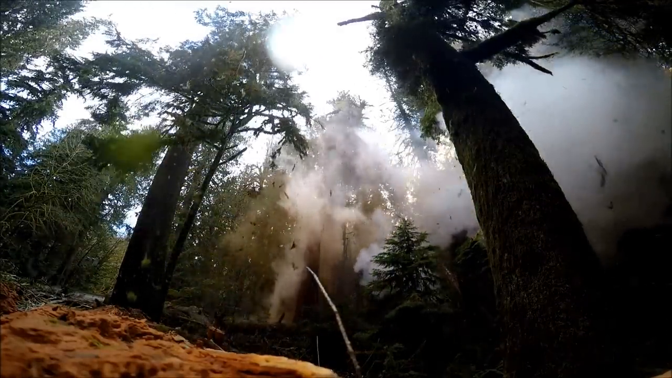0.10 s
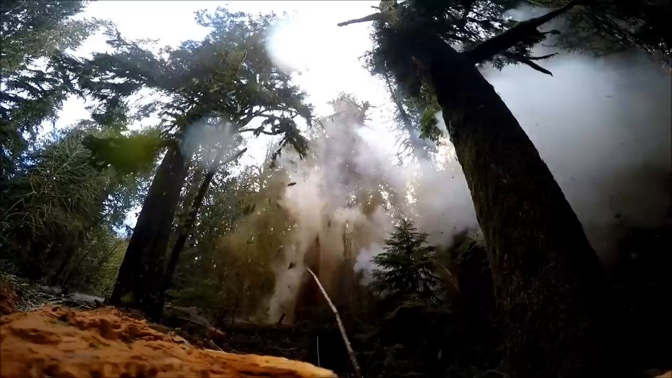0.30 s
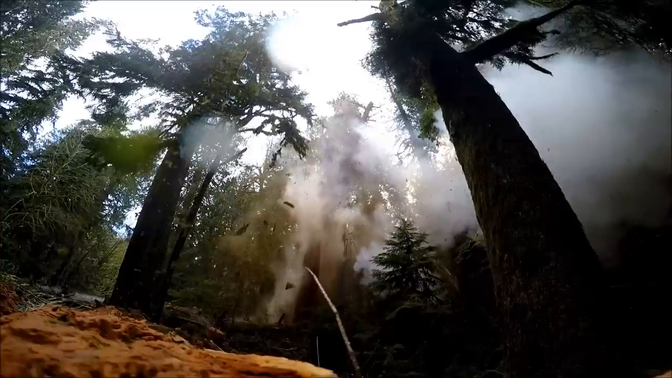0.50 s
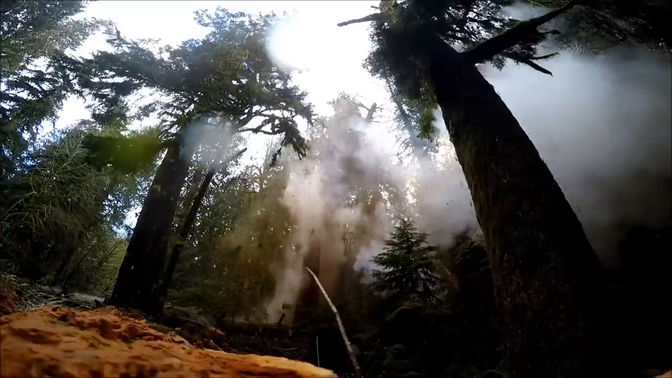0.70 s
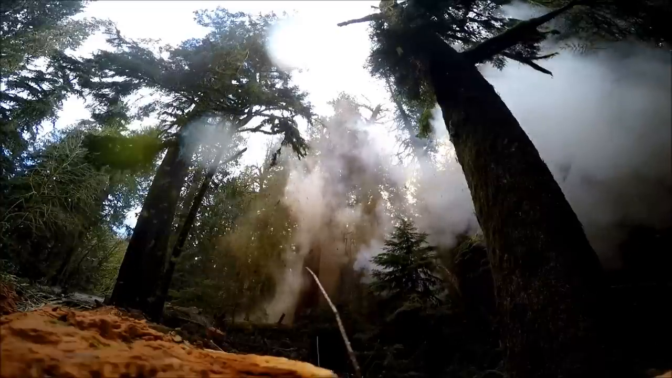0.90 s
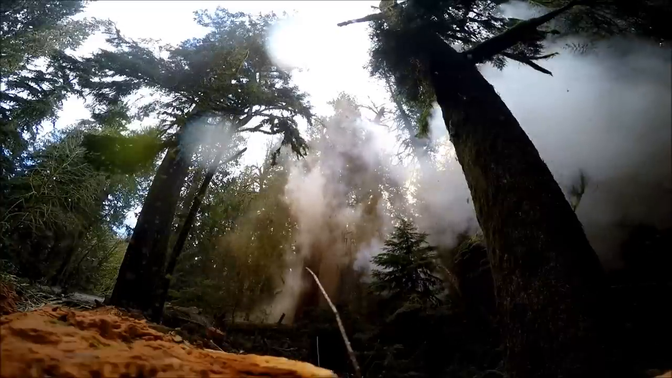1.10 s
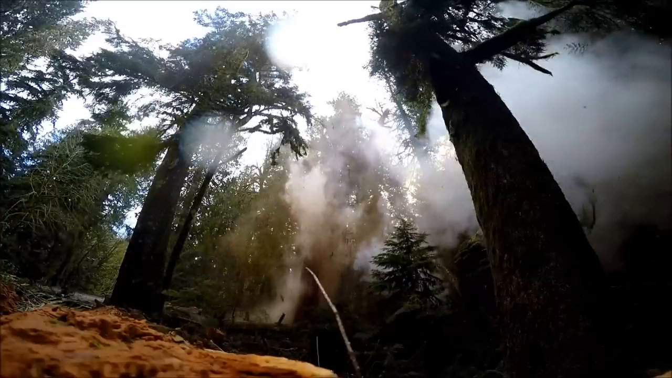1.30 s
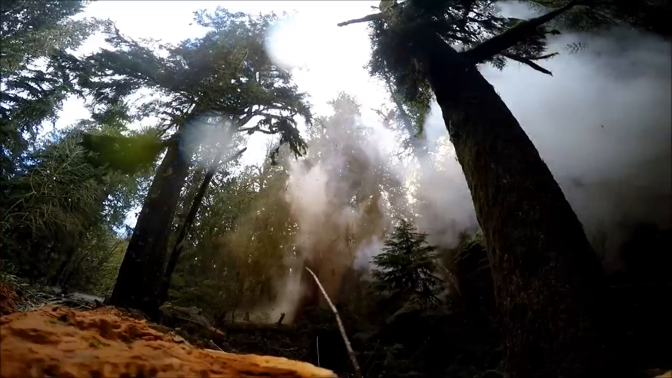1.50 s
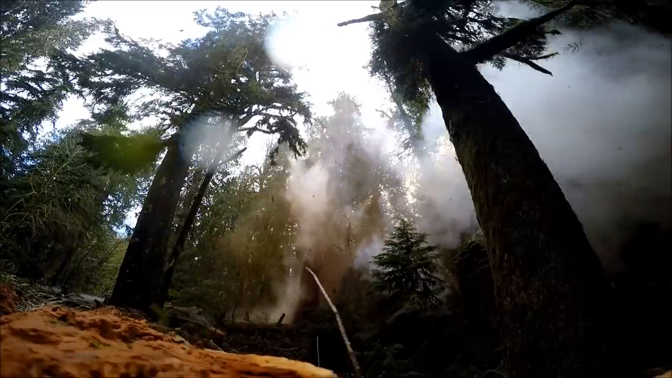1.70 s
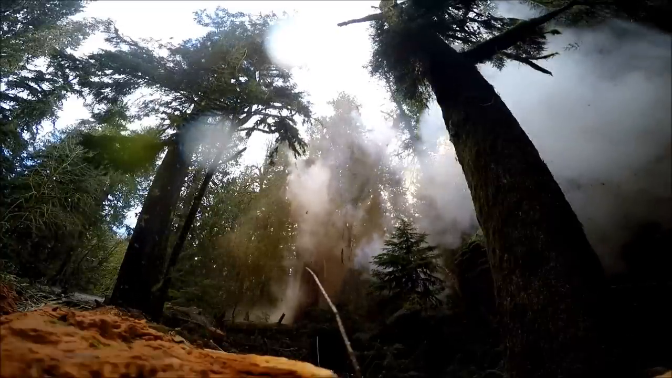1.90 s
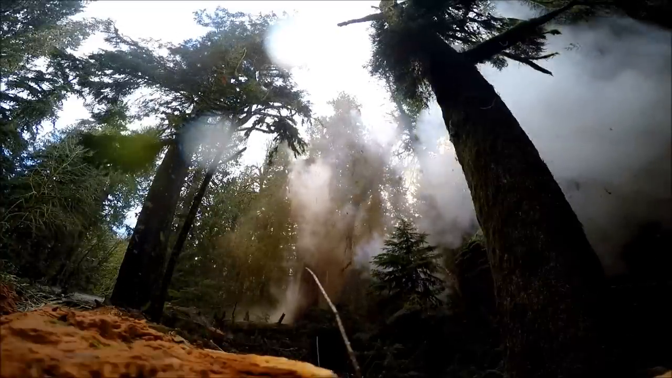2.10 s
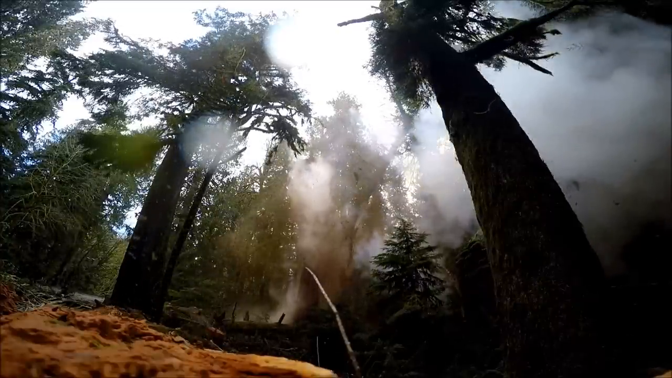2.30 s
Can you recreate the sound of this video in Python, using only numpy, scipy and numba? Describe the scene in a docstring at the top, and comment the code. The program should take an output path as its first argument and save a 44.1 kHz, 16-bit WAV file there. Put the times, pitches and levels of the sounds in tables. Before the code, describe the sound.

Hard chip cracks against a small camera housing, then blast debris patters down over low rumble

```python
"""Forest floor just after a blast, heard by a small camera lying on the ground in a closed housing.
A chip strikes the housing hard: contact pulses ring its modes, a pressure swing overloads the input,
an inner part rings on and the gain control ducks, then creeps up. A smaller chip hits about two seconds later.
Close by, soil and sticks land as shaped noise bursts; farther off debris patters as wash and grains.
Behind it all the rumble of the blast, low coloured noise, swells and ebbs through the trees."""
import sys
import numpy as np
from scipy import signal
from scipy.fft import rfft, irfft
from scipy.io import wavfile
from scipy.ndimage import uniform_filter1d
from numba import njit

SR = 44100
rng = np.random.default_rng(int(sys.argv[2]) if len(sys.argv) > 2 else 0)


def persist_wave(psi):
    """Save psi, clipped to +-1, as 16-bit WAV."""
    counts = np.round(np.clip(psi, -1, 1) * 32767).astype(np.int16)
    wavfile.write(sys.argv[1], SR, np.atleast_2d(counts).T)


N = 110250  # 2.5 s
TIME = np.arange(N) / SR


def undb(db):
    """Decibels to an amplitude factor."""
    return 10 ** (np.asarray(db, float) / 20)


def unit(x):
    """Scale to an RMS of 1."""
    return x / np.sqrt(np.mean(x ** 2))


def curve(rows):
    """A (time [s], value) table read at every sample."""
    return np.interp(TIME, *np.array(rows, float).T)


def colour(x, points):
    """Shape noise by (frequency [Hz], gain [dB]); level below the first point, nearly silent above the last."""
    hz, db = np.array(points, float).T
    f = np.maximum(np.fft.rfftfreq(N, 1 / SR), 1)
    gain = undb(np.interp(np.log(f), np.log(hz), db, right=-120))
    return irfft(rfft(x) * gain, N)


def band(x, hz, width):
    """One resonance with unity gain at its peak."""
    return signal.lfilter(*signal.iirpeak(hz, hz / width, fs=SR), x)


def modes(x, table):
    """Decaying sines rung by x; neighbours swing in opposite sense."""
    out = np.zeros(N)
    for k, (hz, db, t60) in enumerate(table):
        pole = np.exp((2j * np.pi * hz - np.log(1000) / t60) / SR)
        ring = signal.lfilter([1], [1, -pole], x + 0j).imag
        out += (-1) ** k * undb(db) * ring
    return out


def lobe(start, length):
    """One half-sine push of height 1."""
    u = (TIME - start) / length
    return np.sin(np.pi * np.clip(u, 0, 1))


def walk(rate):
    """Random levels, `rate` per second, with straight glides between them."""
    k = int(SR / rate)
    return uniform_filter1d(np.repeat(rng.standard_normal(N // k + 1), k), k)[:N]


# chips touching the housing at the microphone, several contacts each:
# (time [s], impulse level [dB], contact length [s])
CHIP_CONTACTS = [(.2079, 16.5, .00015), (.2086, 20.5, .0002), (.2094, 17.5, 0.00019), (.2103, 16, 0.0002),
                 (.2120, 7, 0.00031), (2.2639, -17, 0.00011), (2.2647, -12.5, 0.00016),
                 (2.2655, -10.5, 0.00011), (2.2661, -11, 0.000084)]


def contact_force():
    """Each contact is a brief half-sine push, scaled so that its length does not change its impulse."""
    return sum(undb(db) * lobe(s, length) / (length * SR) for s, db, length in CHIP_CONTACTS)


# vibration modes of the housing wall: (frequency [Hz], level [dB], decay by 60 dB [s])
SHELL_MODES = [(722.4, -9, .028), (1032.6, -4.5, 0.032), (1320, -7, 0.014), (1487.4, -5, .018),
               (2091.3, -4, 0.018), (2560, -11.5, 0.011), (3545, -10, .011), (4200, -8, .004),
               (5140, -7, 0.0063), (5870, -9, .008), (6370, -11, .007), (7550, -13, .015)]
RATTLE_DB, RATTLE_T60_S = -28, .07
RATTLE_HZ, RATTLE_WIDTH_HZ = 2200, 3200
CRACK_DB, CRACK_HZ, CRACK_WIDTH_HZ = 15.5, 4380, 9500
SHELL_LOW_HZ = 620  # the small housing radiates little below this


def housing(force):
    """The contacts ring the wall, snap broadly and leave a noisy rattle that decays."""
    fade = signal.lfilter([1], [1, -1000 ** (-1 / (RATTLE_T60_S * SR))], force)
    noise = rng.standard_normal(N)
    for _ in range(2):
        noise = band(noise, RATTLE_HZ, RATTLE_WIDTH_HZ)
    rattle = undb(RATTLE_DB + 7 * walk(300)) * fade * noise
    crack = undb(CRACK_DB) * band(force, CRACK_HZ, CRACK_WIDTH_HZ)
    high_pass = signal.butter(N=3, Wn=SHELL_LOW_HZ, btype="high", fs=SR, output="sos")
    return signal.sosfilt(high_pass, modes(force, SHELL_MODES) + rattle + crack)


SQUEEZE_S, SQUEEZE_LEN_S, SQUEEZE_DB = .2111, 0.0023, 15.5
SUCK_S, SUCK_RISE_S, SUCK_DB = .2131, .0057, 20.5


def air_pump():
    """The hard blow squeezes the air around the microphone, then sucks at it and lets go slowly."""
    squeeze = undb(SQUEEZE_DB) * lobe(SQUEEZE_S, SQUEEZE_LEN_S)
    u = np.maximum(TIME - SUCK_S, 0) / SUCK_RISE_S
    suck = undb(SUCK_DB) * u * np.exp(1 - u)  # peaks at u = 1
    return squeeze - suck


# longer ring of an inner part: (frequency [Hz], relative level [dB], decay by 60 dB [s])
INNER_MODES = [(904, -2, .28), (926.2, -15, .15), (1280, -20, .14), (1280, -9, .09), (1380, -1, 0.092),
               (1440, -13, .13), (1960.4, -9, 0.073), (721.6, -4, .05)]
INNER_S, INNER_DB = .21, -2


def inner_part():
    """One short push from the hard blow sets a part inside the camera ringing."""
    push = lobe(INNER_S, 0.00023) / (0.00018 * SR)
    return undb(INNER_DB) * modes(push, INNER_MODES)


def strikes():
    """Both chips sound the housing; the hard blow also pumps the air and rings the inner part."""
    return housing(contact_force()) + air_pump() + inner_part()


# clods and sticks landing nearby: (time [s], thud level [dB], low knock level [dB],
# middle knock level [dB], high knock level [dB], rustle level [dB], fading length [ms])
NEAR_LANDINGS = [(0.114, -70, -63, -78, -56, -71, 7.1), (0.416, -62, -72, -58, -53, -79, 6),
                 (0.51, -57.5, -57, -60, -57, -67.5, 7.2), (0.718, -66, -69.5, -55, -69, -79.5, 6),
                 (0.73, -69, -60, -58, -49.5, -76, 8), (0.754, -55.5, -45, -54.5, -57, -55, 4.95),
                 (0.855, -49, -63, -65, -50, -76, 6), (0.928, -55.5, -50.5, -57, -55, -73.5, 12),
                 (0.975, -49, -66, -51.5, -51, -74, 5.5), (1.017, -37.5, -50, -45.5, -59, -70, 8),
                 (1.033, -57, -65, -54.5, -52.5, -66, 4.75), (1.084, -58, -53, -64, -52.5, -79.5, 9.7),
                 (1.126, -49, -43.5, -39.5, -50.5, -65, 14.8), (1.142, -68, -60, -46, -44, -60, 9.1),
                 (1.163, -55, -63.5, -52, -53, -71.5, 10), (1.287, -51.5, -45.5, -57.5, -60, -71.5, 10.4),
                 (1.344, -62, -55, -55, -69, -74, 8.2), (1.368, -54.5, -60, -76, -70, -66.5, 4.5),
                 (1.422, -64, -56, -46, -57, -63.5, 6.1), (1.559, -53, -56, -56, -52.5, -65.5, 7.5),
                 (1.602, -45, -55, -52, -48.5, -75, 6), (1.62, -59, -58, -59, -60.5, -65.5, 7.1),
                 (1.824, -51.5, -66.5, -68.5, -71, -73, 13), (1.894, -48.5, -54, -51.5, -55, -65.5, 11),
                 (1.912, -66, -44.5, -52, -53, -66, 15), (1.955, -56, -60, -56, -60.5, -77, 15),
                 (1.989, -63, -67, -64, -59, -69.5, 8), (2.09, -75, -51, -51.5, -50.5, -67, 14),
                 (2.132, -67.5, -50, -53.5, -57, -67, 6), (2.21, -68.5, -66.5, -67, -62, -69, 15),
                 (2.225, -73, -58, -67, -58.5, -67.5, 6), (2.362, -53, -50, -56.5, -57, -69, 18),
                 (2.426, -66, -67, -52.5, -54, -71, 10), (2.461, -53.5, -42.5, -57, -55, -70.5, 16),
                 (2.49, -65, -59, -59, -55.5, -64.5, 8)]
# bands of thud, low, middle and high knock, rustle: (frequency [Hz], width [Hz])
THUD_TO_RUSTLE = [(260, 640), (540, 240), (1200, 640), (2050, 890), (4500, 3200)]
CRUNCH_PER_S, CRUNCH_DB = 500, 3.5  # level flutter of crumbs within a landing


def landings():
    """Short crunchy noise bursts, each landing with its own mix of thud, knocks and rustle."""
    out = np.zeros(N)
    crumbs = undb(CRUNCH_DB * walk(CRUNCH_PER_S))
    for k, (hz, width) in enumerate(THUD_TO_RUSTLE):
        noise = crumbs * rng.standard_normal(N)
        for _ in range(3):
            noise = band(noise, hz, width)
        for row in NEAR_LANDINGS:
            start, length_ms = int(row[0] * SR), row[-1]
            count = min(int(length_ms * SR / 400), N - start)  # 2.5 fading lengths
            ms = np.arange(count) * 1000 / SR
            shape = np.clip(ms / .8, 0, 1) * np.exp(-(ms / length_ms) ** 2)
            burst = shape * noise[start:start + count]
            # give every burst the energy of its shape, whatever the noise did
            even = np.sqrt(np.sum(shape ** 2) / np.sum(burst ** 2))
            out[start:start + count] += undb(row[1 + k]) * burst * even
    return out


# colour of the falling soil: (frequency [Hz], relative density [dB per Hz])
PATTER_COLOUR = [(200, -4.5), (400, -5.5), (800, -4), (1600, -8), (2600, -18.5), (3500, -18), (5000, -27.5),
                 (6300, -28.5), (7000, -53)]
# the patter before the housing adds its resonances: (time [s], level [dB])
PATTER_LEVEL = [(0, -64), (.2, -64), (.5, -63), (.8, -60.5), (1.3, -60), (1.7, -62.5), (1.87, -64),
                (1.92, -57.5), (2.04, -60), (2.11, -57.5), (2.3, -61), (2.5, -59)]
GRAINS_PER_S, GRAIN_SPREAD_DB = 330, 2.5
GRAIN_SHARE_DB, GRAIN_S = -4, 0.0018  # level before colouring, decay time constant


def patter():
    """A smooth wash of far debris plus short decaying noise grains of nearer crumbs."""
    falls = rng.random(N) < GRAINS_PER_S / SR
    size = falls * undb(GRAIN_SPREAD_DB * rng.exponential(size=N))
    decay = signal.lfilter([1], [1, -np.exp(-1 / (GRAIN_S * SR))], size)
    grains = decay * rng.standard_normal(N)
    wash = rng.standard_normal(N) * undb(2.5 * walk(14))
    debris = colour(wash + undb(GRAIN_SHARE_DB) * unit(grains), PATTER_COLOUR)
    return unit(debris) * undb(curve(PATTER_LEVEL))


# air resonances in the closed housing: (frequency [Hz], width [Hz], added level [dB])
HOUSING_AIR = [(529, 90, 9), (1160, 170, 2.4), (2076, 250, 11)]


def through_housing(debris):
    """The enclosed air resonates along with the patter outside."""
    return debris + sum(undb(db) * band(debris, hz, width) for hz, width, db in HOUSING_AIR)


# colour of the far rumble: (frequency [Hz], relative density [dB per Hz])
RUMBLE_COLOUR = [(8.8, -29), (15, 3), (86, -1), (122, -7), (194, -20.5), (239, -24), (330, -34),
                 (430, -60.5), (730, -120)]
# rumble rolling through the forest, before its random wander: (time [s], level [dB])
RUMBLE_LEVEL = [(0, -36), (.3, -38.5), (.55, -42), (.8, -38), (1.3, -36.5), (1.9, -39), (2.5, -41.5)]


def rumble():
    """Low coloured noise that rolls in and out, its level wandering a little at random."""
    noise = unit(colour(rng.standard_normal(N), RUMBLE_COLOUR))
    return noise * undb(curve(RUMBLE_LEVEL) + 2.5 * walk(9))


def scene():
    """Sum of all that reaches the microphone, from the housing outwards."""
    return (strikes() + landings() + through_housing(patter()) + rumble())[None]


@njit
def follow(db, attack, hold, release):
    """Peak level in dB: rises fast, holds, then sinks at a steady rate."""
    out, e, wait = np.empty(len(db)), db[0], 0.
    for i in range(len(db)):
        if db[i] > e:
            e, wait = e + (db[i] - e) * attack, hold
        elif wait > 0:
            wait -= 1
        else:
            e -= release
        out[i] = e
    return out


CEILING_DB, DEEPEST_CUT_DB = -1, 15
DUCK_S, WAIT_S, RECOVER_DB_S = 0.0018, 0.42, 9  # duck time constant, hold, recovery in dB per second


def gain_control(x):
    """Cut what passes the ceiling, wait, then creep back."""
    over = np.clip(20 * np.log10(np.abs(x) + 1e-9) - CEILING_DB, 0, DEEPEST_CUT_DB)
    return x * undb(-follow(over, 1 / (DUCK_S * SR), WAIT_S * SR, RECOVER_DB_S / SR))


def low_pass(x, hz, stop_db):
    """Steep top cut without delay; what then passes full scale is clipped."""
    sos = signal.ellip(8, .1, stop_db, hz, fs=SR, output="sos")
    return np.clip(signal.sosfiltfilt(sos, x), -1, 1)


WHINE_HZ, WHINE_DB, HISS_DB = 6315, -81.5, -97  # levels where each is added
BASS_HZ, BASS_Q = 9.4, .57
CLIP_DB = 0.18
CAMERA_HZ, TOP_HZ = 7550, 15800


def record(dry):
    """Camera: electronic whine, bass cut, gain control, overload, narrow band, hiss, final top cut."""
    x = dry[0] + undb(WHINE_DB) * np.sin(2 * np.pi * WHINE_HZ * TIME)
    w = 2 * np.pi * BASS_HZ
    x = signal.lfilter(*signal.bilinear([1, 0, 0], [1, w / BASS_Q, w ** 2], SR), x)
    x = gain_control(x)
    x = np.clip(x, -undb(CLIP_DB), undb(CLIP_DB))
    x = low_pass(x, CAMERA_HZ, stop_db=50)
    x = x + undb(HISS_DB) * rng.standard_normal(N)
    return low_pass(x, TOP_HZ, stop_db=40)[None]


dry = scene()
out = record(dry)
persist_wave(out)
```